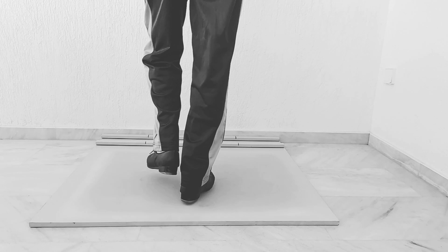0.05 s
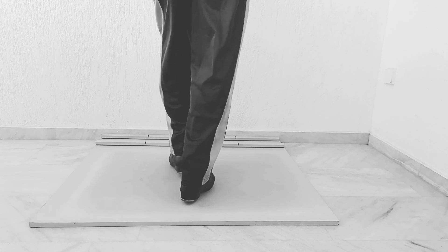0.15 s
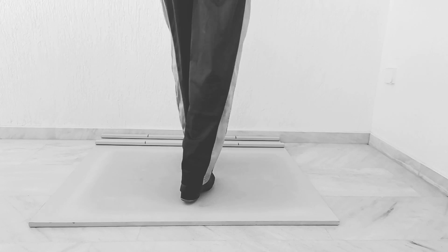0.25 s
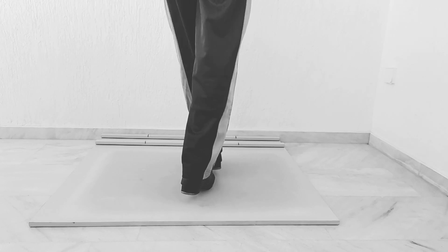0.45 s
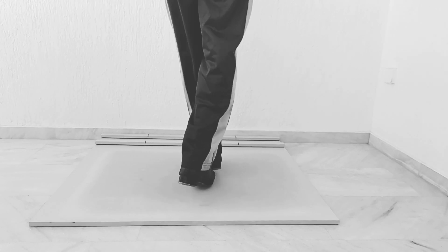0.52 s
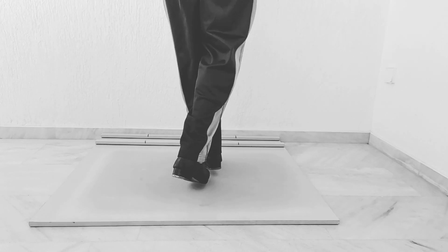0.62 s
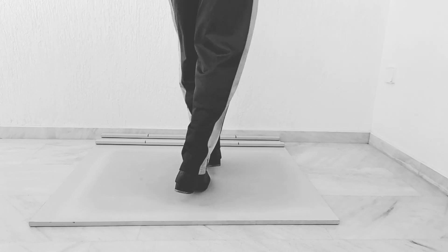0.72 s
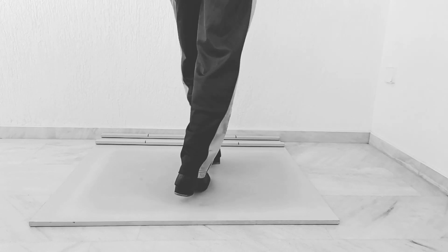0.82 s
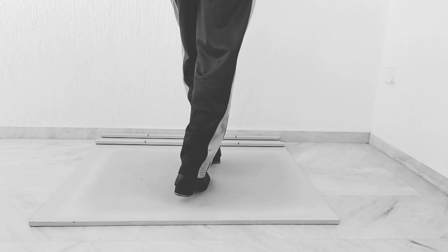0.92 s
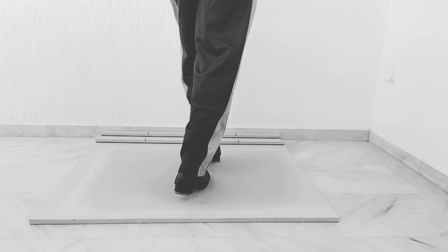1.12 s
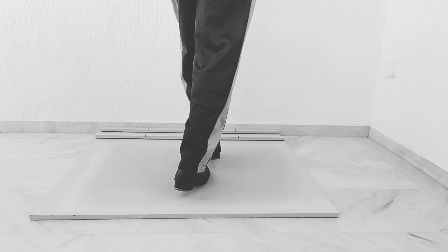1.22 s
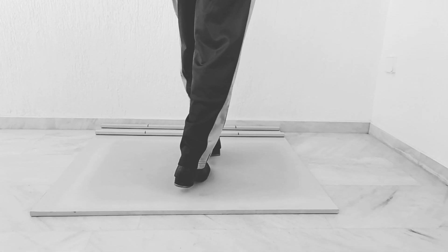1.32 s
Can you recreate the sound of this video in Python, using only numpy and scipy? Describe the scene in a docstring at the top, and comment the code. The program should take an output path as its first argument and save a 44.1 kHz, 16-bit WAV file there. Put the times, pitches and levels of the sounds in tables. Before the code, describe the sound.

Tap shoes on a wooden board in a bare, hard-walled room. It opens inside the ringing tail of a step, then bright metallic clacks with a woody knock land at about 0.16, 0.42 and 0.68 seconds, each briefly reverberating. The last leaves a thin, beating ring. From 1.05 faint dull board ticks follow, with a tiny squeak and soft swish around 1.2 to 1.3, over quiet room noise.

```python
"""Over quiet room noise a dancer in tap shoes steps evenly on a wooden board on the stone floor of a bare room.
The scene opens inside the first step. Each step is a light touch, the blow of the metal tap and a second
contact as the shoe settles: shaped noise for contacts and walls, damped modes for board and tap.
The last step leaves a thin ring; faint board ticks follow, then a light brush, a tiny squeak
and a soft swish, made of noise in smooth swells."""
import sys
import numpy as np
from scipy import signal
from scipy.fft import rfft, irfft, next_fast_len
from scipy.io import wavfile
from scipy.ndimage import map_coordinates

SR = 44100
rng = np.random.default_rng(int(sys.argv[2]) if len(sys.argv) > 2 else 0)


def store_wav(level_fs):
    """Save 16-bit WAV to argv[1]."""
    pcm = np.round(np.clip(np.atleast_2d(level_fs), -1, 1) * 32767)
    wavfile.write(sys.argv[1], SR, pcm.T.astype(np.int16))


N = 59535

TOUCH_S = 0.0025  # the light touch comes this long before the blow
BLOW_RISE_S = 0.001  # also the attack of the tap's ring and of the ticks
ROOM_RISE_S = 0.0083  # shared by the early scatter and the reverberation


def amp(db):
    """Decibels to gain."""
    return 10 ** (np.asarray(db) / 20)


def along(points, hz):
    """Interpolate (frequency, value) points on a log-frequency axis."""
    f, values = np.transpose(points)
    return np.interp(np.log(hz + 1), np.log(f + 1), values)


def filtered(x, response):
    """Multiply the spectrum of x by a response of frequency, padded against wrap-around."""
    n = x.shape[-1]
    size = next_fast_len(n + SR // 4)
    spectrum = rfft(x, size) * response(np.fft.rfftfreq(size, 1 / SR))
    return irfft(spectrum, size)[..., :n]


def coloured(x, colour_db, size=8192):
    """Filter x causally (minimum phase, by folding the cepstrum) to the given dB per frequency."""
    gain = amp(colour_db(np.fft.rfftfreq(size, 1 / SR)))
    cepstrum = irfft(np.log(gain))
    cepstrum[1:size // 2] *= 2
    cepstrum[size // 2 + 1:] = 0
    impulse = irfft(np.exp(rfft(cepstrum)))
    return signal.fftconvolve(x, impulse[None], axes=1)[:, :x.shape[1]]


def pair():
    """White stereo noise whose left-right likeness varies with frequency, from mid and side noise."""
    # (frequency [Hz], left-right correlation [-1 to 1])
    alike = [(60, 0.49), (250, .85), (500, 1), (1000, 0.49), (2000, .25), (4000, 0), (12000, 0.046)]

    def mid_side_gains(hz):
        angle = np.arccos(np.clip(along(alike, hz), -1, 1)) / 2
        return np.array([np.cos(angle), np.sin(angle)])
    mid, side = filtered(rng.standard_normal((2, N)), mid_side_gains)
    return np.array([mid + side, mid - side])


def rush(spectrum):
    """Steady stereo noise coloured by (frequency [Hz], relative level [dB]), scaled to rms 1."""
    x = filtered(pair(), lambda hz: amp(along(spectrum, hz)))
    return x / x.std()


def fade(t, t60):
    """An exponential decay of 60 dB in t60."""
    return np.exp(-np.log(1000) * t / t60)


def burst(t, rise, t60):
    """An envelope of energy 1 that rises from t = 0 and dies away."""
    t = np.maximum(t, 0)
    shape = (1 - np.exp(-t / rise)) * fade(t, t60)
    return shape / (np.linalg.norm(shape) + 1e-12)


def swell(s, width_s, db):
    """A bell-shaped envelope centred on s, with its peak gain in dB."""
    t = np.arange(N) / SR
    return amp(db) * np.exp(-((t - s) / width_s) ** 2 / 2)


def add(out, x, s):
    """Mix x into out from time s, which may lie before the start."""
    k = round(s * SR)
    x = x[:, max(-k, 0):N - max(k, 0)]
    out[:, max(k, 0):max(k, 0) + x.shape[1]] += x


def ring(modes, t, attack, spread):
    """Damped modes of slightly random level; spread scatters left-right phase [radians]."""
    t = np.maximum(t, 0)
    out = np.zeros((2, N))
    for hz, db, t60 in modes:
        phase = rng.uniform(0, 2 * np.pi) + spread * rng.standard_normal((2, 1))
        gain = amp(db + rng.standard_normal())
        out += gain * fade(t, t60) * np.sin(2 * np.pi * hz * t + phase)
    return out * (1 - np.exp(-t / attack))


def room_noise():
    """Steady, quiet noise of the room."""
    # (frequency [Hz], relative level [dB])
    floor = [(25, -1.5), (70, -5), (130, -12.5), (250, -7), (450, -19.5), (1000, -17.5), (1500, -25),
             (3300, -17.5), (6200, -35), (9500, -32), (11500, -55), (16000, -64.5)]
    return amp(-61) * rush(floor)


def room_tail(t):
    """The bare room's reverberation: noise whose bands decay separately, treble first."""
    # (frequency [Hz], t60 [s])
    room = [(60, 1), (250, 0.57), (700, 0.47), (1300, 0.5), (2050, 0.49), (3000, 0.47), (4500, 0.44),
            (8000, 0.36), (14000, 0.2)]
    hz, s, bands = signal.stft(pair(), SR, nperseg=256)
    decaying = bands * fade(s, along(room, hz)[:, None])
    tail = signal.istft(decaying, SR, nperseg=256)[1][:, :N]
    tail = tail * (1 - np.exp(-np.maximum(t, 0) / ROOM_RISE_S))
    return tail / np.sqrt(np.sum(tail ** 2) / 2)  # mean energy of 1 per channel


def crack(t, touch_db, blow_db, second_s, second_db):
    """Noise bursts of the three contacts, first walls, early scatter and reverberation, in the tap's colour."""
    # first walls: (delay after the blow [s], level [dB])
    walls = [(.0045, -8), (0.01, -9.5), (0.013, -7.5), (.028, -9.5), (0.046, -12.5)]
    # colour of a tap on the board: (frequency [Hz], relative level [dB])
    tap = [(30, -38.5), (70, -16), (115, -24), (190, -12.5), (400, -11.5), (620, -5), (790, -8.5),
           (970, -3.5), (1250, -4.5), (1800, -1), (2700, -2), (4200, -10.5), (7500, -15), (9100, -10.5),
           (10700, -15.5), (11500, -25), (14500, -28), (16000, -48.5)]
    tap_db, contact_db, scatter_db, tail_db = 21, -5, -2.5, -3
    blow_t60_s, scatter_t60_s = 0.012, 0.19
    contacts = [(-TOUCH_S, contact_db + touch_db), (0, contact_db + blow_db),
                (second_s, contact_db + second_db)]
    # unrelated arrivals add in power
    power = sum((amp(db) * burst(t - s, BLOW_RISE_S, blow_t60_s)) ** 2 for s, db in contacts + walls)
    # early scatter off floor and corner
    power = power + (amp(scatter_db) * burst(t, ROOM_RISE_S, scatter_t60_s)) ** 2
    noise = np.sqrt(power) * pair() + amp(tail_db) * room_tail(t)
    return coloured(noise, lambda hz: tap_db + along(tap, hz))


def board_ring(t):
    """The wooden board rings in slowly rising damped modes."""
    # (frequency [Hz], level [dB], t60 [s])
    board = [(78, -56, .2), (163.5, -50, .3), (188.7, -48, .6), (258.3, -41, .4), (503, -43, .25),
             (567, -42.5, .4), (925, -31, .14), (987, -31, 0.14), (1184, -42.5, 0.59), (1436, -38.5, 0.45),
             (1523, -36, .22)]
    return ring(board, t, attack=0.006, spread=0.25)


def plate_ring(t):
    """The metal tap rings in short, bright damped modes."""
    # (frequency [Hz], level [dB], t60 [s])
    plate = [(1790, -33, .22), (1930, -27.5, 0.22), (2167, -26, .25), (2750, -34.5, .16),
             (6080, -43.5, .12), (8900, -30.5, .12), (9160, -34.5, 0.11)]
    return ring(plate, t, BLOW_RISE_S, spread=1.6)


def snap(t):
    """The hard clack of the blow itself: modes that die within milliseconds."""
    # (frequency [Hz], level [dB], t60 [s])
    snap_modes = [(2316, -11, 0.013), (4270, -19, 0.0064)]
    return ring(snap_modes, t, BLOW_RISE_S, spread=0.4)


def hollow_knock(t):
    """The board's hollow knock, one damped mode just after the blow."""
    # (frequency [Hz], level [dB], t60 [s])
    knock_mode = [(984, -20, .05)]
    delay_s = 0.012
    return ring(knock_mode, t - delay_s, attack=0.0018, spread=0.8)


def ripple(hz):
    """A random unevenness of each step's spectrum: peaks and dips in dB, deepest in the treble."""
    scale_db, width_hz, from_hz = 2.6, 130, 3000
    knots = rng.standard_normal(int(SR / 2 / width_hz) + 4)
    return scale_db * hz / (hz + from_hz) * map_coordinates(knots, [hz / width_hz])


def landing_colour(hz, range_dbs, hollow_hzs, hollow_db):
    """How the shoe lands decides which ranges stand out and which are hollow, in dB; a ripple is added."""
    # thud, knock, clack, click: (centre [Hz], width [octaves])
    ranges = [(130, 1.8), (1000, 0.32), (2250, 0.28), (7360, 0.6)]
    hollow_width_hz = 250
    humps = sum(db * np.exp(-(np.log2((hz + 1) / centre) / width) ** 2)
                for db, (centre, width) in zip(range_dbs, ranges))
    hollows = sum(np.exp(-((hz - centre) / hollow_width_hz) ** 2) for centre in hollow_hzs)
    return humps - hollow_db * hollows + ripple(hz)


def step(thud_db, knock_db, clack_db, click_db, board_db, touch_db, blow_db, second_s, second_db,
         low_hollow_hz, high_hollow_hz, hollow_db):
    """One step: contacts and their echoes, ringing board and tap, snap and knock, in the landing's colour."""
    t = np.arange(N) / SR - TOUCH_S  # zero at the blow
    sound = crack(t, touch_db, blow_db, second_s, second_db)
    sound = sound + amp(board_db) * board_ring(t) + plate_ring(t)
    sound = sound + amp(blow_db) * snap(t) + amp(knock_db) * hollow_knock(t)
    range_dbs = (thud_db, knock_db, clack_db, click_db)
    hollow_hzs = (low_hollow_hz, high_hollow_hz)
    return coloured(sound, lambda hz: landing_colour(hz, range_dbs, hollow_hzs, hollow_db))


def bass_lag(hz):
    """Slow bending waves bring the bass late: a phase turn that delays only the low tones."""
    lowest_delay_s, below_hz = 0.007, 170
    return np.exp(-2j * np.pi * lowest_delay_s * below_hz * np.tanh(hz / below_hz))


def dancer():
    """All the steps, each placed by the time of its blow, with their lagging bass."""
    # (blow time [s], level [dB], thud [dB], knock [dB], clack [dB], click [dB], board ring [dB],
    #  touch [dB], blow [dB], second contact after the blow [s], second contact [dB],
    #  lower hollow [Hz], upper hollow [Hz], hollow depth [dB])
    steps = [(-.097, 1.5, -4, -2.5, 1.5, 4, 3.5, -17, 1, .006, -3, 4980, 7800, 10),
             (0.1635, 0, -5.5, -1, 2, 4.5, 3, -21.5, 2.5, 0.0052, 1.5, 4775, 7570, 7),
             (0.424, -2.5, 5.5, -3, 0.5, 6.5, 4, -7, 3.5, .0085, 2.5, 2506, 6150, 13.5),
             (0.6849, 1, -1.5, 3, 3, 0, 2.5, -16, 5, 0.0086, 0, 1434, 7780, 2.5)]
    out = np.zeros((2, N))
    for s, db, *manner in steps:
        add(out, amp(db) * filtered(step(*manner), bass_lag), s - TOUCH_S)
    return out


def after_ring():
    """The thin ring left by the last step: close damped modes that beat together."""
    # (frequency [Hz], level [dB], t60 [s])
    after_modes = [(664, -39, .42), (687, -36, .74), (707, -38.5, .52), (747, -44, .7)]
    start_s = 0.70
    return ring(after_modes, np.arange(N) / SR - start_s, attack=0.021, spread=0.49)


def settling():
    """Faint dull ticks as weight settles on the board: decaying bursts of one dark noise."""
    # (time [s], level [dB])
    ticks = [(1.056, -59.5), (1.128, -60), (1.174, -58), (1.222, -66.5), (1.266, -60.5)]
    # (frequency [Hz], relative level [dB])
    tick_colour = [(100, -9), (200, -7), (450, -14), (750, -5), (1000, -1), (1400, -17), (4000, -30),
                   (12000, -44.5)]
    t60_s = 0.059
    envelope = np.zeros(N)
    for s, db in ticks:
        since = np.maximum(np.arange(N) / SR - s, 0)
        envelope += amp(db) * (1 - np.exp(-since / BLOW_RISE_S)) * fade(since, t60_s)
    return rush(tick_colour) * envelope


def brush():
    """A leg shifts: a light swell of friction noise leads into the swish."""
    # (frequency [Hz], relative level [dB])
    brush_colour = [(1500, -20.5), (3000, -3.5), (4600, 7), (6200, -3), (9500, -7), (11500, -31)]
    return swell(s=1.205, width_s=0.042, db=-68) * rush(brush_colour)


def squeak():
    """One tiny squeak of the shifting leg: a brief swell of narrow-band noise."""
    centre_hz, width_hz = 4680, 130
    noise = filtered(pair(), lambda hz: np.exp(-((hz - centre_hz) / width_hz) ** 2))
    return swell(s=1.197, width_s=0.012, db=-62) * noise / noise.std()


def swish():
    """The leg's soft swish: a bell-shaped swell of friction noise."""
    # (frequency [Hz], relative level [dB])
    swish_colour = [(800, -27.5), (2400, -16.5), (3300, 6), (4000, 3), (5500, -19.5), (9500, -19.5),
                    (11500, -34.5)]
    return swell(s=1.27, width_s=0.043, db=-60) * rush(swish_colour)


def scene():
    """All the sounds over the room noise, with a left-right balance that varies with frequency."""
    # (frequency [Hz], left minus right [dB])
    balance = [(60, 3), (250, 5.5), (600, 2.5), (2000, 3.5), (3200, -6.5), (6000, 2), (9100, -5.5),
               (12000, 2.5)]
    sound = room_noise() + dancer() + after_ring() + settling() + brush() + squeak() + swish()
    half_each = np.array([[0.5], [-0.5]])
    return filtered(sound, lambda hz: amp(half_each * along(balance, hz)))


def record(dry):
    """A soft limiter rounds off the highest peaks, then a steep low-pass sets the band limit."""
    ceiling, top_hz = 0.82, 16100  # ceiling in full scale
    rounded = dry / (1 + np.abs(dry / ceiling) ** 8) ** (1 / 8)
    return filtered(rounded, lambda hz: 1 / (1 + (hz / top_hz) ** 120))


dry = scene()
out = record(dry)
store_wav(out)
```